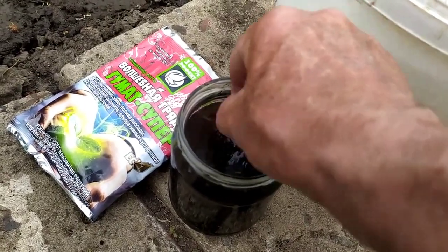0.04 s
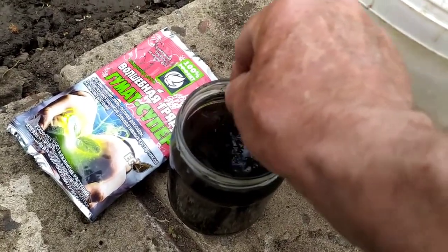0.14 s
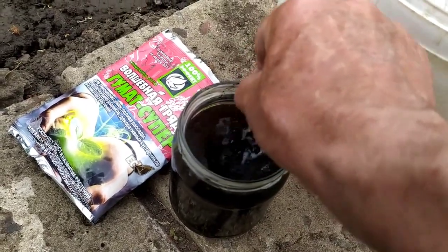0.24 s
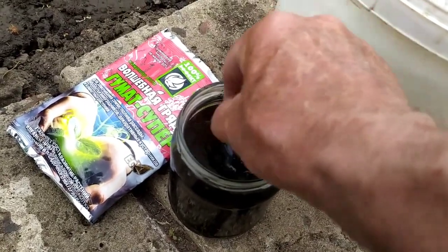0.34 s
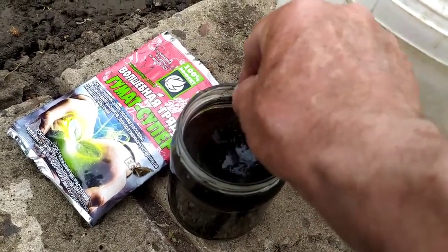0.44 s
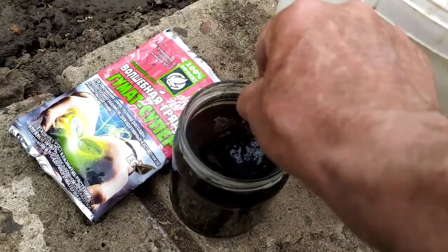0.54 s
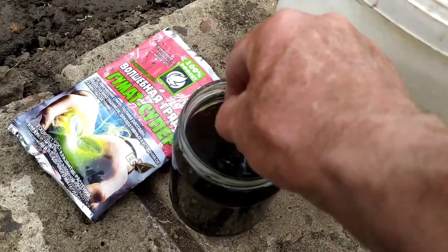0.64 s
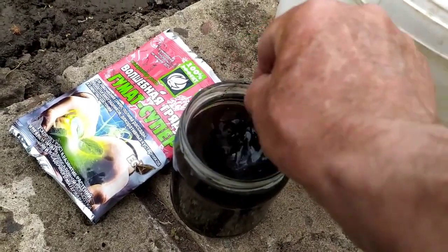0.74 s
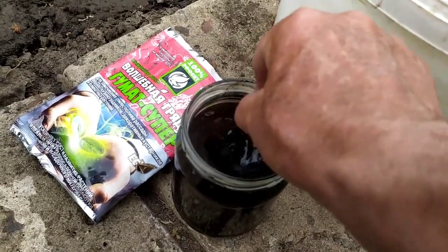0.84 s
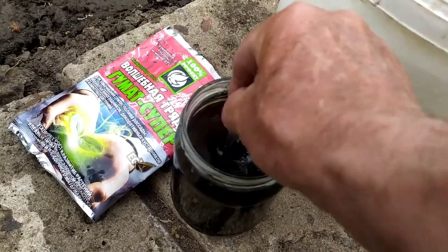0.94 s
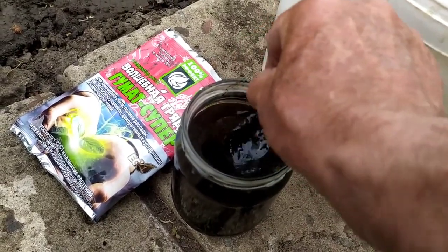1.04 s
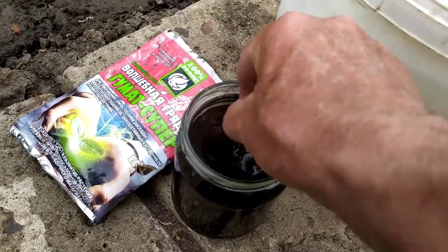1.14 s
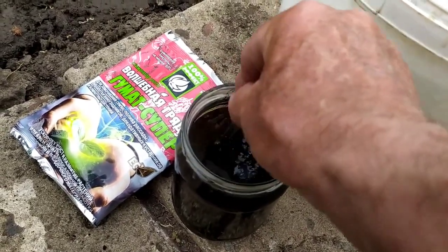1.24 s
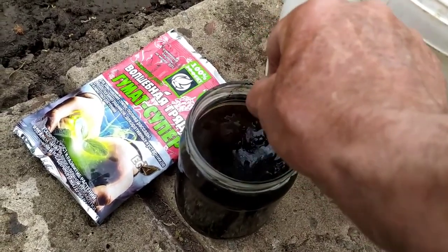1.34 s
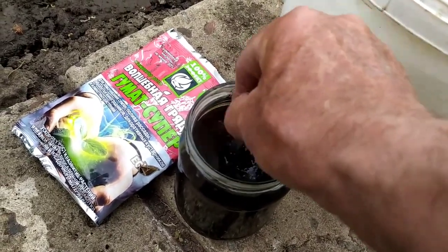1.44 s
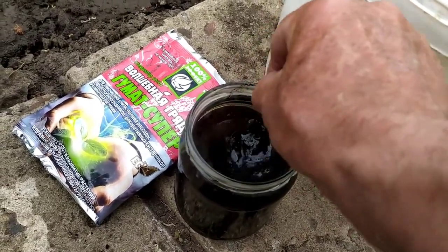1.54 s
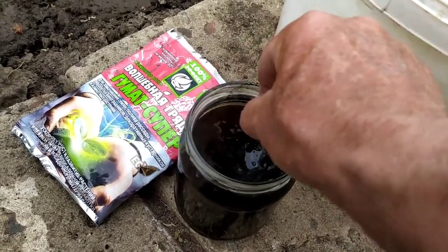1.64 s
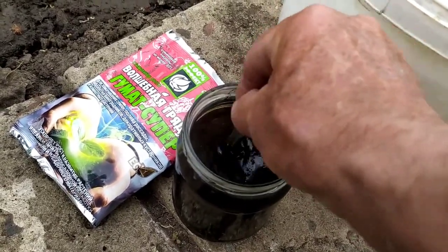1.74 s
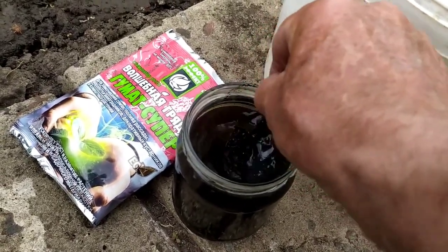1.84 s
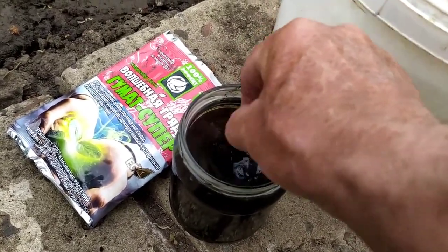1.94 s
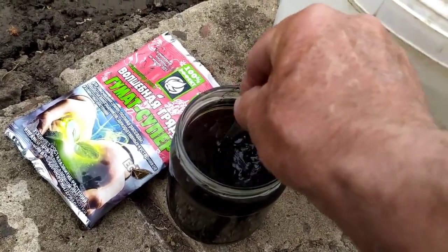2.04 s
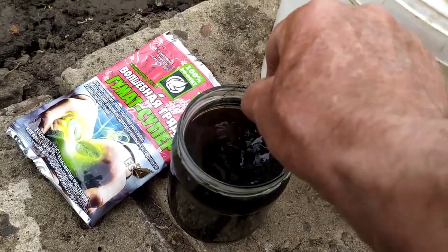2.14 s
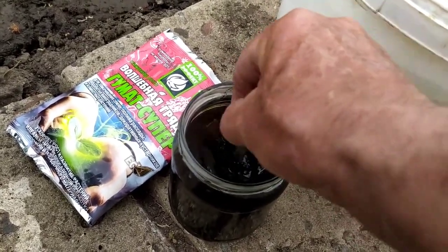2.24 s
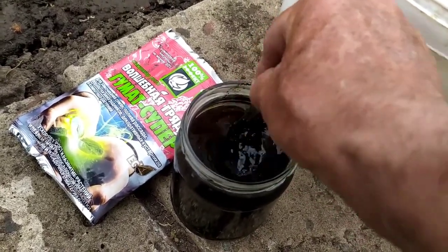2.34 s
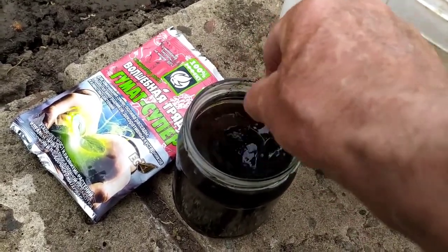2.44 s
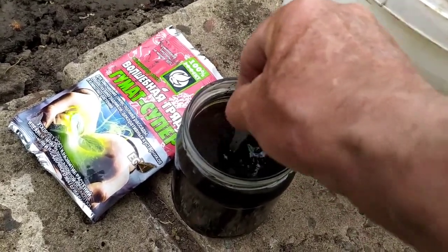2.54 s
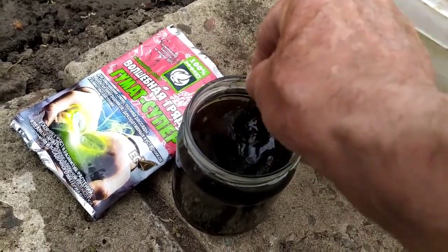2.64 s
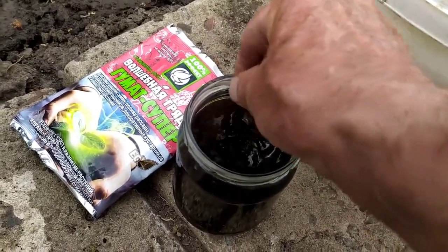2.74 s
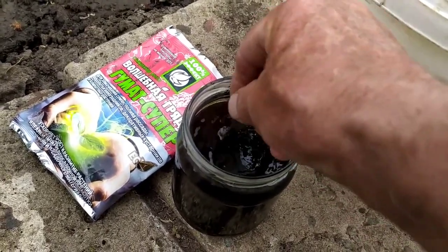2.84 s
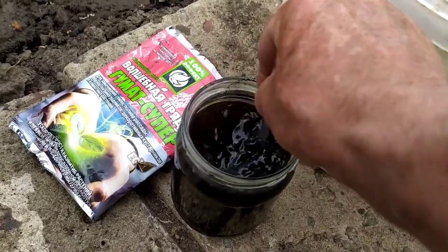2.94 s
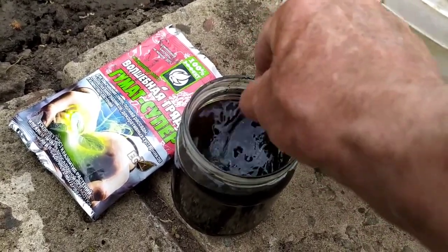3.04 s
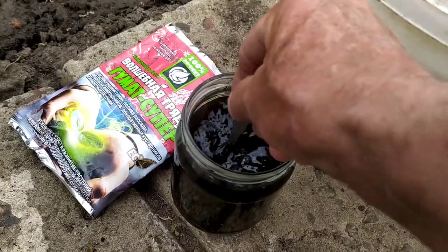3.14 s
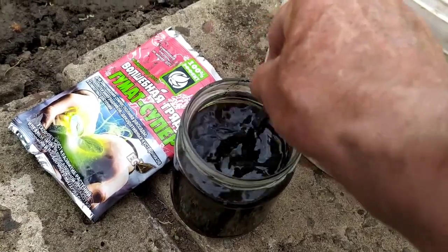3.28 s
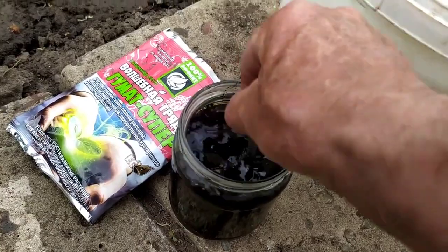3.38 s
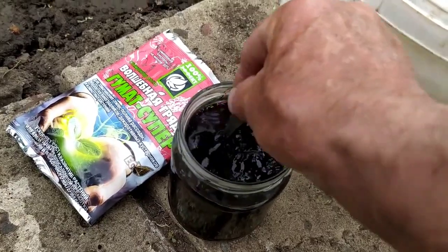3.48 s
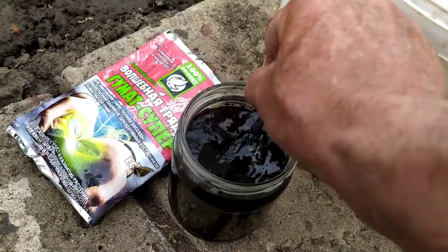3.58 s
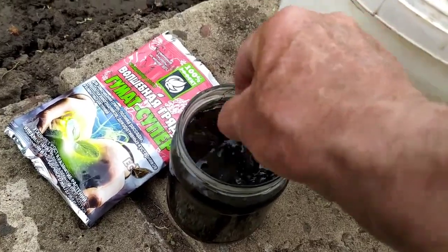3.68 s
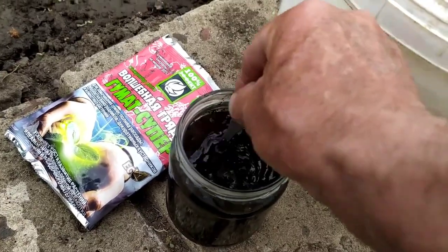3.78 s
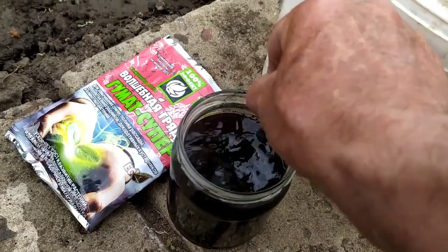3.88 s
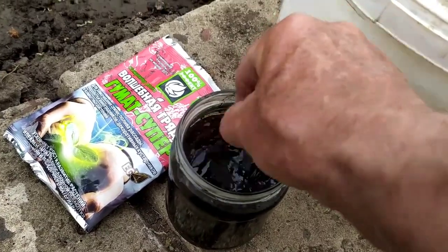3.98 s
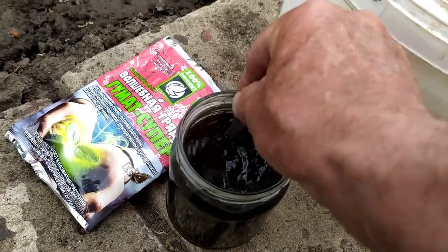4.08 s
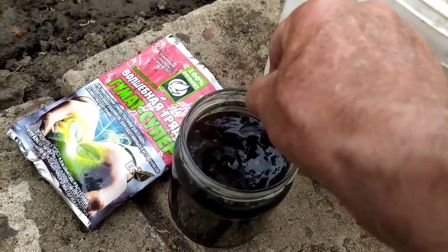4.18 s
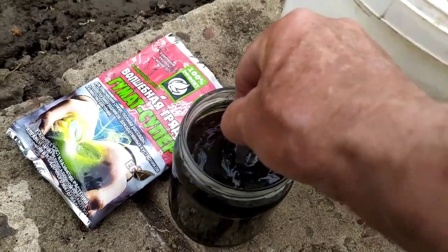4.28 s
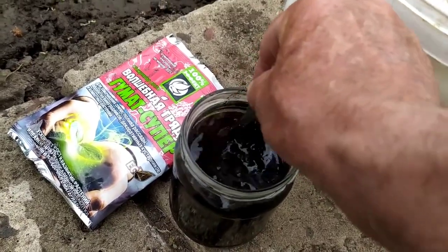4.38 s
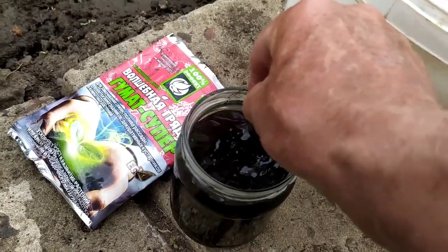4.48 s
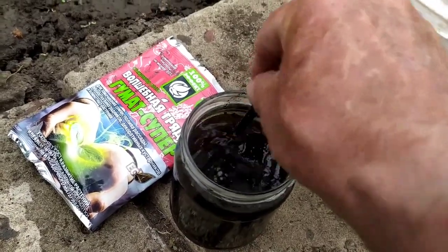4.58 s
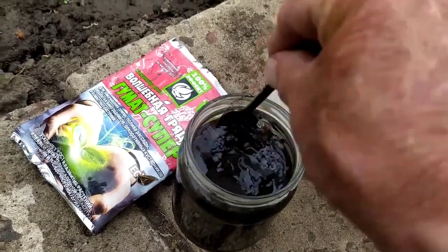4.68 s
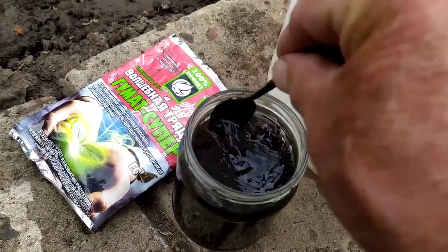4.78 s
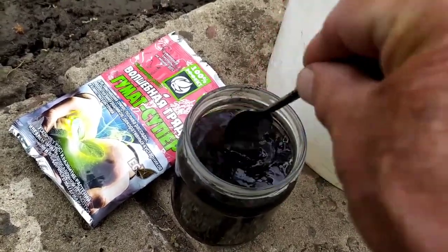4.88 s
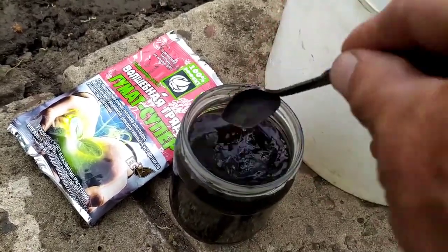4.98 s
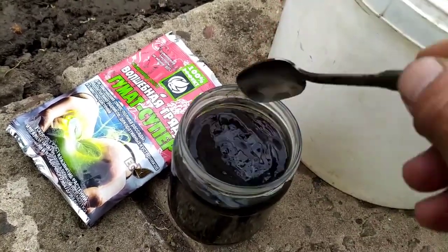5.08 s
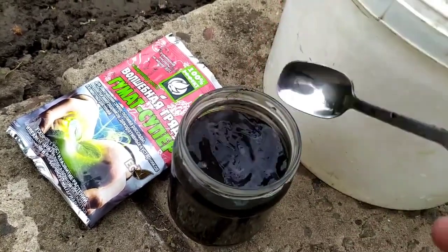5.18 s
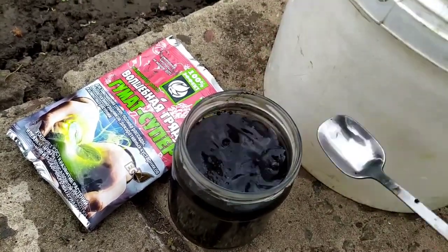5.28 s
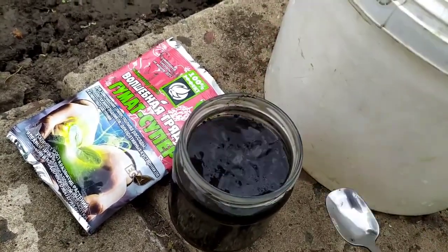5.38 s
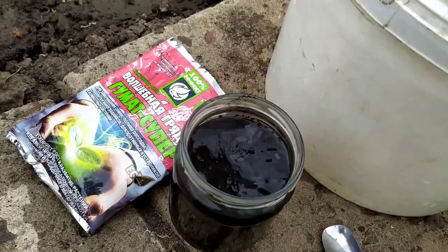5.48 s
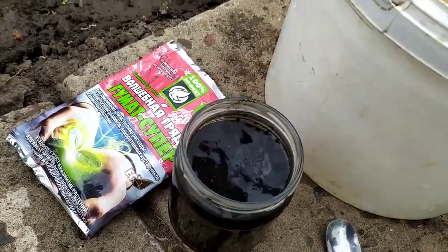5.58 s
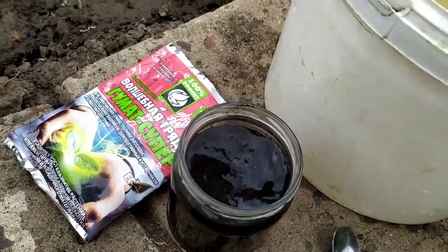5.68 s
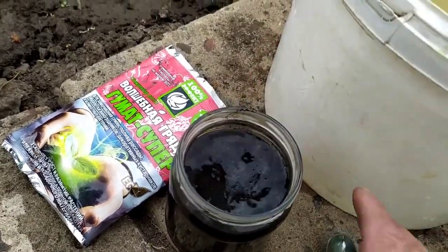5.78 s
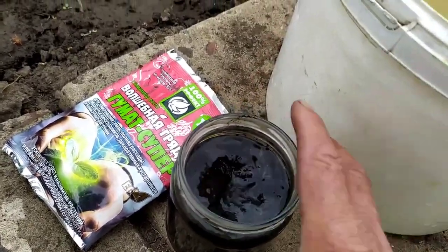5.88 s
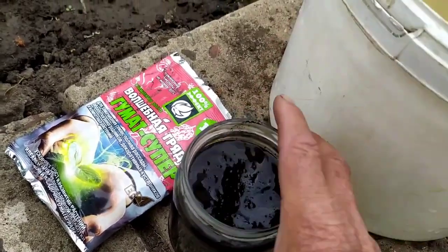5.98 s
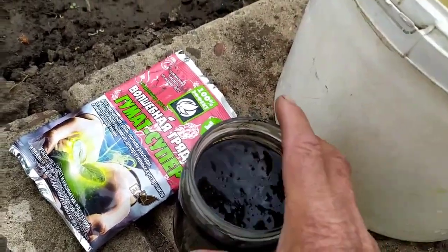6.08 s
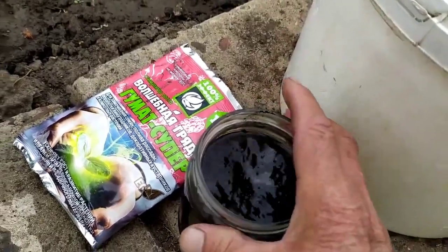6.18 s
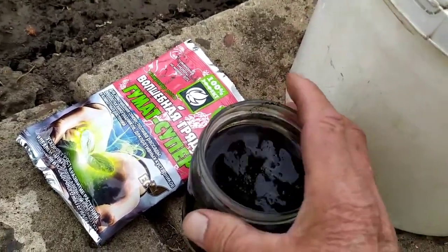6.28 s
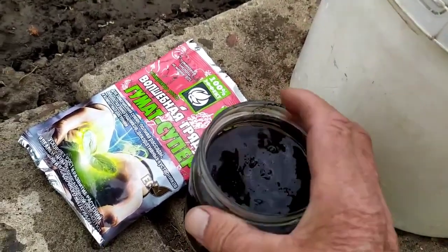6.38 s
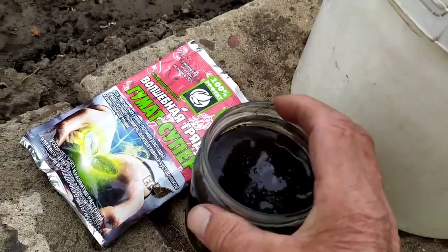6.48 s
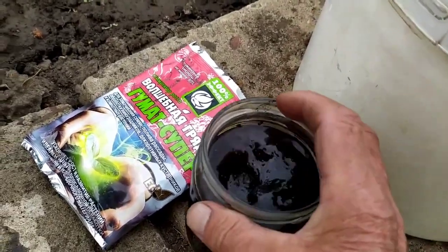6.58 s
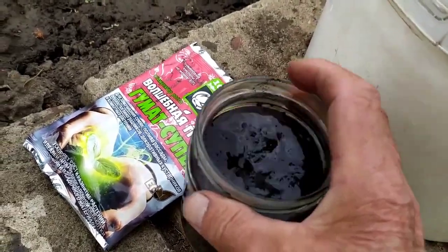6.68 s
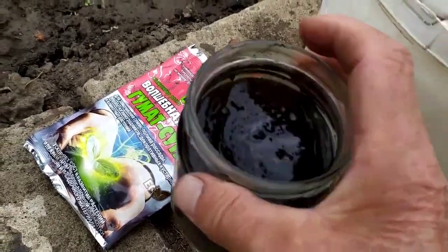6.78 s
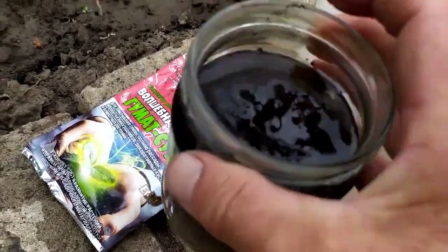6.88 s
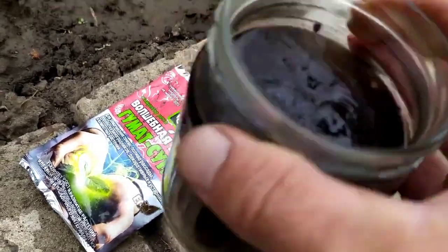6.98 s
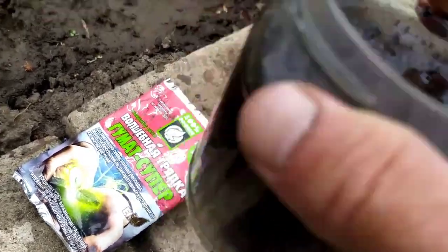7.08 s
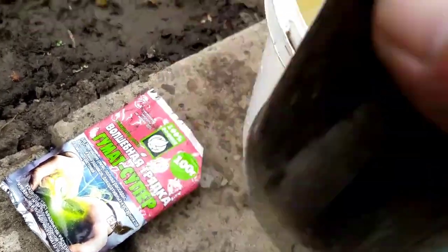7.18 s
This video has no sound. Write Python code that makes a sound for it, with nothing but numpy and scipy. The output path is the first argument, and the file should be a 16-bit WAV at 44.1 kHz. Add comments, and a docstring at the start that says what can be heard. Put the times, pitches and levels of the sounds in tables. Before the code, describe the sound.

Rapid, dry glass clinks in a steady turning rhythm, with gritty scrapes and a soft liquid swirl, heard very near outdoors. After a brief gap with tiny bubbles come several firmer clinks, then a last tap and a wet blip. A short pause, then a spoon lands and bounces on stone with a high metallic ring. Faint jar knocks follow, over far falling bird calls and quiet air.

```python
"""A garden: close to the microphone, a steel spoon stirs liquid in a glass jar on a stone slab.
Each contact of the spoon is a burst of tiny slips that rings short glass modes and feeds one long wall note.
The liquid swirls as coloured noise; its bubbles gurgle as short rising tones while the spoon comes out.
The spoon is laid on the stone and rings in its own modes; the jar then knocks on the slab as it is picked up.
Far off, birds call in falling notes and blurred chirps, behind them quiet air and an unsteady drone."""
import sys
import numpy as np
from scipy import signal
from scipy.fft import rfft, irfft
from scipy.io import wavfile
from scipy.ndimage import uniform_filter1d

SR = 44100
rng = np.random.default_rng(int(sys.argv[2]) if len(sys.argv) > 2 else 0)


def pcm_store(signal):
    """Save signal as 16-bit PCM."""
    levels = np.round(np.clip(np.atleast_2d(signal), -1, 1) * 32767)
    wavfile.write(sys.argv[1], SR, levels.astype(np.int16).T)


N = 318522


def amp(db):
    """Decibels to gain."""
    return 10 ** (np.asarray(db) / 20)


def unit(x):
    """Scales to rms 1."""
    return x / np.sqrt(np.mean(x ** 2) + 1e-20)


def read(points, hz):
    """Reads a spectrum on a log-frequency axis."""
    f, value = np.transpose(points)
    return np.interp(np.log(hz + 1), np.log(f + 1), value)


def sides(pan_db):
    """Left and right gains for a level difference."""
    return amp(np.array([pan_db / 2, -pan_db / 2]))


def add(mix, s, sound):
    """Mixes a stereo sound in at time s."""
    part = mix[:, max(round(s * SR), 0):][:, :sound.shape[1]]
    part += sound[:, :part.shape[1]]


def noise(size, colour, pan_db=0, same=0.42):
    """Stereo noise of rms 1 with the spectrum colour(Hz) in dB, partly alike in both ears."""
    left, other = rfft(rng.standard_normal((2, size)))
    same = np.clip(same, 0, 1)
    right = same * left + np.sqrt(1 - same ** 2) * other
    spectra = np.array([left, right]) * amp(colour(np.fft.rfftfreq(size, 1 / SR)))
    return unit(irfft(spectra * sides(pan_db * np.ones(len(left))), size))


def ring(t, hz, db, t60, pan_db, spread=1.2, wander=.6):
    """Dying modes; each reaches the two ears with its own level and phase."""
    lag = spread * np.cos(np.arange(len(hz))) + wander * rng.standard_normal(len(hz))
    lag = lag * np.minimum(hz / 2000, 1)  # bass is near mono
    phase = 2 * np.pi * rng.random(len(hz)) + np.outer([0, 1], lag)
    waves = amp(db[:, None] - 60 * t / t60[:, None]) * np.exp(2j * np.pi * hz[:, None] * t)
    return ((sides(pan_db) * np.exp(1j * phase)) @ waves).real


def echoes(x, wet_db=-21, t60=0.05, size=12000):
    """Sparse random reflections that die away, as from the slab and the things around it."""
    t = np.arange(size) / SR
    hits = rng.random((2, size)) < 3000 / SR
    taps = rng.standard_normal((2, size)) * hits * amp(-60 * t / t60) * (t > .002)
    taps /= np.linalg.norm(taps, axis=1, keepdims=True)
    return amp(wet_db) * signal.fftconvolve(x, taps, axes=1)[:, :N]


# spectrum of the outdoor air: f/Hz, relative level/dB per Hz
AIR_COLOUR = [(20, -31.5), (32, -17.5), (45, -11), (70, 0), (110, -5.5), (370, -12), (1000, -21.5),
              (2300, -17.5), (3600, -13.5), (6000, -20), (8000, -21), (12000, -22.5), (16000, -35.5)]
AIR_DB, HUM_HZ, HUM_DB = -66, 52.5, -72.5


def garden():
    """Quiet outdoor air as broad noise, with a far, unsteady drone as narrow noise."""
    pan_db = read([(500, -0.5), (4000, 3)], np.fft.rfftfreq(N, 1 / SR))
    air = noise(N, lambda f: read(AIR_COLOUR, f), pan_db, same=0.23)
    drone = noise(N, lambda f: -np.minimum(6 * ((f - HUM_HZ) / 8) ** 2, 100), same=0.875)
    return amp(AIR_DB) * air + amp(HUM_DB) * drone


# course of the swirling liquid: t/s, level/dB before its lumps
SWIRL_LEVEL = [(0, -71.5), (2.7, -83.5), (3.0, -88), (3.75, -78.5), (3.9, -67), (4.25, -61.5), (4.5, -69.5),
               (4.85, -84), (5.0, -93)]
# spectrum of the swirl: f/Hz, relative level/dB per Hz
SWIRL_COLOUR = [(100, -8.5), (250, 3.5), (450, -2), (700, 2.5), (900, 6.5), (1200, -10), (2500, -14.5),
                (6000, -9.5), (16000, -44)]


def swirl(lumps_db=2.2):
    """The liquid turning in the jar: soft coloured noise whose level comes in lumps."""
    rush = noise(N, lambda f: read(SWIRL_COLOUR, f), -2, same=0.9)
    rush *= amp(np.interp(np.arange(N) / SR, *np.transpose(SWIRL_LEVEL)))
    return rush * amp(lumps_db * unit(uniform_filter1d(rng.standard_normal(N), size=900)))


def pressing(skid_s):
    """Share of pressure the spoon keeps on the glass: little for a clean rebound, near 1 for a scrape."""
    return skid_s / (skid_s + 0.0023)


def tinted(colour, thud_db=0, bright_db=0, treble_db=0):
    """A contact's spectrum with its low thud, its 4.7 kHz modes and its treble raised or lowered."""
    hz = np.geomspace(150, 16000, 160)
    tint = [(150, 0), (450, thud_db), (1200, thud_db), (3500, 0),
            (4400, bright_db), (5000, bright_db), (6000, 0), (7500, treble_db)]
    return np.column_stack([hz, read(colour, hz) + read(tint, hz)])


# once a turn the bowl strikes the wall:
# t/s, relative blow level/dB, relative wall note level/dB, brightness of the 4.7 kHz modes/dB
STRIKES = [(.047, -26.5, -36, -3.5), (.321, -24, -37.5, 4), (.606, -29, -40.5, -2),
           (.882, -24, -36.5, -2.5), (1.157, -24, -35, -6.5), (1.431, -24.5, -34, 4),
           (1.695, -24, -34.5, -2), (1.976, -22, -35, -3.5), (2.243, -22, -32.5, 0),
           (2.521, -23.5, -34, -3), (3.116, -24, -43, -8), (3.419, -19.5, -20, -5),
           (3.719, -19.5, -22, -9.5), (3.999, -19, -30.5, 1.5), (4.292, -23.5, -31.5, 2),
           (4.662, -28, -37.5, -3), (4.727, -19.5, -42, -10.5)]
# tint of a strike: f/Hz, level/dB
STRIKE_COLOUR = [(150, -4), (450, -8.5), (900, -6), (1200, 0.5), (2000, -4.5), (2800, 1.5), (3300, 0),
                 (3800, 1.5), (4400, 4), (4800, -1), (5500, -0.5), (7400, 5), (8300, -1), (9100, 1.5),
                 (10000, 8), (11500, 4.5), (14000, 1.5)]
STRIKE_SKID_S = 0.0014


def strikes():
    """Clean rebounds of the bowl off the wall, as (s, blow dB, colour, wall dB, skid s)."""
    return [(s, blow_db, tinted(STRIKE_COLOUR, bright_db=bright_db), wall_db, STRIKE_SKID_S)
            for s, blow_db, wall_db, bright_db in STRIKES]


# the tip scrapes over the bottom: t/s, relative blow level/dB, skid time/s
SCRAPES = [(.070, -23.5, 0.0067), (0.114, -41, 0.011), (.375, -31.5, .003), (.644, -27, 0.0043),
           (.908, -24.5, 0.0061), (.957, -41.5, 0.0083), (1.188, -32, .003), (1.200, -29.5, .003),
           (1.469, -31, 0.0061), (1.538, -40, 0.013), (1.731, -23.5, 0.0069), (2.010, -26.5, 0.009),
           (2.083, -39, .019), (2.290, -31, 0.0036), (2.344, -40.5, 0.03), (2.593, -32.5, 0.012),
           (2.639, -41.5, 0.015), (2.718, -45.5, 0.016), (2.862, -32.5, 0.0069), (3.789, -36, 0.035),
           (4.094, -36, 0.0081), (4.424, -36, .012), (4.732, -28, 0.009)]
# tint of a scrape: f/Hz, level/dB
SCRAPE_COLOUR = [(150, 0.5), (330, -3), (500, 6), (900, 4), (1200, 4), (2000, 4), (2800, 2), (3300, -2.5),
                 (3900, 2), (4400, -4.5), (4750, 0), (5500, 2), (6100, -4.5), (7300, -5.5), (8300, 3.5),
                 (9000, -2), (10500, -3), (14000, 1.5)]
CATCH_S, GRAZE_DB, CATCH_DB = .007, -2, -2  # the tip grazes first and catches a moment later
SCRAPE_WALL_DB, FIRM_DB = -12.5, -27.5  # wall note against the blow; force that leaves the tint alone
SCRAPE_TREBLE_SLOPE, SCRAPE_THUD_SLOPE = 0.68, -0.22  # dB per dB of force: softer is duller and hollower


def scrapes():
    """Two contacts per scrape, as the tip grazes and then catches; rows as in strikes()."""
    rows = []
    for s, db, skid_s in SCRAPES:
        force_db = db - FIRM_DB
        colour = tinted(SCRAPE_COLOUR, thud_db=SCRAPE_THUD_SLOPE * force_db,
                        treble_db=SCRAPE_TREBLE_SLOPE * force_db)
        for at, blow_db in [(s, db + GRAZE_DB), (s + CATCH_S, db + CATCH_DB)]:
            rows.append((at, blow_db, colour, blow_db + SCRAPE_WALL_DB, skid_s))
    return rows


# light taps on the far side of the jar: t/s, relative blow level/dB, thud/dB, treble/dB
TAPS = [(0.164, -27.5, 5.5, -5.5), (.199, -28.5, -12, -0.5), (.456, -31, 6, -7), (.486, -31, -8, 5),
        (.739, -27.5, 3, -5.5), (0.767, -34, -6, 0), (1.007, -29, 5, -6), (1.041, -29.5, -10.5, -1.5),
        (1.239, -39.5, 10, -4), (1.279, -27, 1.5, -11.5), (1.309, -35, -6, -3), (1.585, -30, -10, 8),
        (1.82, -27, 3.5, -11), (1.852, -37, -8.5, -7), (2.13, -36.5, -8.5, -5.5), (2.28, -25.5, 0, 11),
        (2.397, -33, -4, 2), (2.684, -36.5, -5, 1), (3.169, -39, -2, -4), (3.237, -30, 2, -2.5),
        (3.493, -40.5, 18, 7), (3.573, -42, -5.5, -0.5), (3.765, -35.5, 7, -3), (4.053, -28.5, 3.5, 5.5),
        (4.155, -36.5, -8, -1.5), (4.321, -24.5, 4, 7), (4.414, -26.5, -1.5, -1), (4.473, -30, -9, 2.5),
        (4.569, -34.5, 9, -2.5)]
# tint of a tap: f/Hz, level/dB
TAP_COLOUR = [(150, -4), (450, -1.5), (850, 3), (1200, -4), (1600, 2.5), (2000, -0.5), (3500, 0.5),
              (4400, -5), (4700, 6.5), (5200, -2), (6200, 1), (7500, -1), (9000, 1.5), (10000, -7),
              (12000, 1), (14000, -2)]
TAP_SKID_S, TAP_LINGER, TAP_WALL_DB = 0.0023, 0.86, -22.5  # shortest skid; dB longer per dB duller


def taps():
    """Light taps, the duller ones staying longer on the glass; rows as in strikes()."""
    rows = []
    for s, db, thud_db, treble_db in TAPS:
        colour = tinted(TAP_COLOUR, thud_db=thud_db, treble_db=treble_db)
        skid_s = TAP_SKID_S * amp(-TAP_LINGER * min(treble_db, 0))
        rows.append((s, db, colour, db + TAP_WALL_DB, skid_s))
    return rows


def contacts():
    """All contacts of spoon and jar in order of time."""
    return sorted(strikes() + taps() + scrapes(), key=lambda row: row[0])


def skid(skid_s, slips_per_s=1500, slip=0.6, drag_db=-20, drag_s=0.033, catches_per_s=220, size=8192):
    """Force of one contact: a first blow, a burst of tiny slips, then sparse catches as the spoon drags on."""
    t = np.arange(size) / SR
    chance = np.array([[slips_per_s], [catches_per_s]]) / SR
    slips, catches = rng.standard_normal((2, size)) * (rng.random((2, size)) < chance)
    drag = amp(drag_db) * pressing(skid_s) * catches * np.exp(-t / drag_s)
    force = slip * slips * np.exp(-t / skid_s) + drag
    force[0] = 1
    return force


# short modes of jar and spoon: f/Hz before detuning, level/dB before tint and scatter, t60/s, L-R/dB
JAR_MODES = [(489.6, -23, 0.053, -4), (895, -24, 0.03, 3), (1174, -16, 0.029, -7), (2062, -10.5, 0.026, 13),
             (2845, -18, 0.053, 11.5), (3299, -7, 0.085, -3), (4444, 0.5, 0.024, 8),
             (4662, -0.5, 0.051, 10), (5005, -8.5, 0.048, 9.5), (5570, -11, 0.019, 14),
             (6072, -5, 0.047, 5.5), (6300, -9, 0.028, 16), (7540, -8.5, 0.029, 16),
             (8187, -10, 0.032, 18.5), (8930, -6.5, 0.019, 16.5), (9956, -7.5, 0.019, 14),
             (10420, -8.5, 0.018, 16), (11080, -19.5, 0.021, 9.5), (14380, -17, 0.014, 9)]
# dense crack of a contact: f/Hz, relative level/dB per Hz before tint
CRACK_COLOUR = [(60, -24.5), (250, -18), (500, -11.5), (1200, -3.5), (2300, 0.5), (3700, -6.5),
                (5000, -3.5), (6800, -4.5), (9000, -2), (11000, -6), (12600, -16.5), (14500, -16.5),
                (16500, -27)]
# place of the crack between the ears: f/Hz, L-R/dB
CRACK_PAN = [(400, 1.5), (1200, -4), (2200, 8), (5500, -3), (9500, 9), (13000, 7)]


def clinks(level_db=-.5, crack_db=3, crack_t60=0.021, rub_db=-24, rub_t60=0.23, scatter_db=2.5,
           detune=0.006, glassy=0.65, size=8192):
    """Each contact rings the short modes; where the spoon lands shifts their balance."""
    out, t = np.zeros((2, N)), np.arange(size) / SR
    hz, db, t60, pan_db = np.transpose(JAR_MODES)
    crack_pan = read(CRACK_PAN, np.fft.rfftfreq(size, 1 / SR))
    wall_s, wall_hz, _ = np.transpose(WALL_NOTE)
    for s, blow_db, colour, wall_db, skid_s in contacts():
        # a blow that hardly stirs the wall's lowest mode also misses its second, the longest one here
        second_db = glassy * np.clip(wall_db - blow_db + 16.5, -18, 2) * (t60 == t60.max())
        slosh = 0.31 * (np.interp(s, wall_s, wall_hz) / wall_hz[0] - 1)  # these follow the liquid less
        luck = rng.standard_normal((2, len(hz)))
        mode_hz = hz * (1 + slosh + detune * luck[0])
        mode_db = db + second_db + read(colour, hz) + scatter_db * luck[1]
        modes = ring(t, mode_hz, mode_db, t60, pan_db, spread=1.96, wander=1.0)
        grit = noise(size, lambda f: read(CRACK_COLOUR, f) + read(colour, f), crack_pan, same=0.53)
        # the crack dies at once; the spoon then rubs faintly along the glass
        crack = amp(crack_db - 60 * t / crack_t60)
        rub = pressing(skid_s) * amp(rub_db - 60 * t / rub_t60)
        hit = (modes + grit * (crack + rub)) * (1 - np.exp(-t / 0.00047))
        hit = signal.fftconvolve(hit, skid(skid_s)[None], axes=1)
        power = np.sum(hit ** 2) / 2 / (.01 * SR)  # the whole energy as if spread over 10 ms
        add(out, s, amp(blow_db + level_db) * hit / np.sqrt(power))
    return out


# the wall's lowest mode, which follows the slosh of the liquid: t/s, f/Hz, t60/s
WALL_NOTE = [(0, 1602, 0.65), (2.55, 1593, 0.67), (2.9, 1603, 0.24), (3.121, 1610, 0.21),
             (3.301, 1644, 0.11), (3.42, 1653, 0.24), (3.72, 1664, 0.25), (4.0, 1627, 0.4),
             (4.3, 1633, 0.28), (4.7, 1638, 0.28)]


def wall(pan_db=0.0, lag=1.6, damping_db=-3.0, size=30000):
    """The glass wall's long note; each contact feeds it at a chance phase and damps it as the spoon presses."""
    t, level = np.arange(N) / SR, np.zeros(N, complex)
    s, hz, t60 = np.transpose(WALL_NOTE)
    for at, _, _, wall_db, skid_s in contacts():
        span = slice(round(at * SR), round(at * SR) + size)
        fresh = amp(wall_db - 60 * t[:size] / np.interp(at, s, t60))
        old = level[span] * amp(damping_db * pressing(skid_s))
        chance = np.exp(2j * np.pi * rng.random())
        turn = np.exp(1j * np.angle(old[0] + fresh[0] * chance))
        level[span] = np.hypot(fresh, abs(old)) * turn
    carrier = np.exp(2j * np.pi * np.cumsum(np.interp(t, s, hz)) / SR)
    note = uniform_filter1d(level, size=80) * carrier
    return np.outer(sides(pan_db) * np.exp([0, -1j * lag]), note).real


BIRD_PAN_DB = 4


def chirp(length, start_hz, end_hz, width_hz, db):
    """A pitch sweep blurred by slow noise, as fast trills and echoes blur a far call."""
    u = np.arange(0, 1, 1 / (length * SR))
    blur = noise(SR, lambda f: -4 * np.minimum(f / width_hz, 5) ** 2, BIRD_PAN_DB, same=0.26)[:, :len(u)]
    sweep = np.sin(2 * np.pi * np.cumsum(start_hz + (end_hz - start_hz) * u) / SR)
    return amp(db - 0.5) * unit(blur * sweep * np.sin(np.pi * u) ** 0.68)


# far sparrow calls: t/s, length of the first syllable/s, its start f/Hz, relative level/dB
SPARROW_CALLS = [(.235, 0.12, 6700, -58), (0.701, .11, 6300, -60), (1.03, 0.087, 6600, -56),
                 (1.589, 0.11, 6400, -58), (2.955, .12, 6600, -57), (3.49, .11, 6520, -63.5),
                 (4.781, 0.095, 6560, -59), (5.325, 0.19, 6400, -61.5), (5.946, 0.11, 6640, -57.5),
                 (6.094, 0.28, 5550, -66.5), (6.30, .12, 6500, -63), (6.597, .11, 6580, -57.5),
                 (6.975, 0.13, 5630, -60)]
SYLLABLE_FALL, CHIRP_WIDTH = 0.15, 0.11  # shares of a syllable's start pitch
LOW_PITCH, LOW_DELAY, LOW_LENGTH, LOW_DB = .67, .5, .7, -2  # second syllable: shares of the first; dB


def sparrows():
    """Far sparrows call in two falling syllables, high then low."""
    out = np.zeros((2, N))
    for s, length, top_hz, db in SPARROW_CALLS:
        high = (s, length, top_hz, db)
        low = (s + LOW_DELAY * length, LOW_LENGTH * length, LOW_PITCH * top_hz, db + LOW_DB)
        for at, span, hz, level_db in [high, low]:
            add(out, at, chirp(span, hz, hz * (1 - SYLLABLE_FALL), CHIRP_WIDTH * hz, level_db))
    return out


# air pockets in the liquid: t/s, start f/Hz, tone level/dB
BUBBLES = [(2.815, 1290, -47), (2.828, 1620, -40), (2.836, 5510, -26), (2.862, 1293, -39.5),
           (2.898, 1920, -38), (2.909, 1710, -33), (2.918, 3100, -35.5), (2.962, 1750, -39.5),
           (3.116, 1128, -31), (3.238, 1130, -38), (3.494, 1905, -37), (3.522, 1533, -38.5),
           (4.761, 1673, -27), (4.785, 2010, -32.5), (4.794, 1720, -32), (4.825, 1515, -45),
           (4.846, 1900, -52)]
BUBBLE_CYCLES, BUBBLE_RISE = 30, .1  # life in cycles; pitch rise over that life, as a share


def bubbles(pan_db=3, splash=0.46, splash_slope_db=20):
    """Bubbles ring and rise in pitch as they surface, each with a little splash of noise."""
    out, t = np.zeros((2, N)), np.arange(4096) / SR
    for s, hz, db in BUBBLES:
        life = BUBBLE_CYCLES / hz
        pitch = hz * (1 + BUBBLE_RISE * np.minimum(t / life, 2))
        tone = np.sin(2 * np.pi * np.cumsum(pitch) / SR)
        froth = noise(len(t), lambda f: -splash_slope_db * abs(np.log2((f + 1) / hz)))
        shape = (1 - np.exp(-t / 0.00066)) * np.exp(-2 * (t / life) ** 1.25)
        add(out, s, amp(db) * shape * (tone + splash * froth) * sides(pan_db)[:, None])
    return out


# far thin whistles: t/s, relative level/dB
WHISTLES = [(3.674, -60.5), (3.87, -58.5)]


def whistles(length_s=.046, from_hz=2650, to_hz=3880, width_hz=110):
    """A thin rising whistle, far off."""
    out = np.zeros((2, N))
    for s, db in WHISTLES:
        add(out, s, chirp(length_s, from_hz, to_hz, width_hz, db))
    return out


# small gritty ticks: t/s, click level/dB
TICKS = [(4.932, -53), (6.784, -52), (6.819, -50), (6.893, -49)]
TICK_KNOCK_DB, TICK_T60 = -14, 0.025
# the spoon lands and rattles on the stone: t/s, click level/dB, t60/s
LANDINGS = [(5.558, -18.5, 0.01), (5.697, -25, 0.0084), (5.72, -38, 0.037), (5.752, -43.5, 0.11),
            (5.773, -43.5, .15)]
LANDING_KNOCK_DB = -15
# the jar rocks on the slab as it is gripped: t/s, knock level/dB
ROCKS = [(6.252, -49.5), (6.301, -38), (6.412, -52.5), (6.48, -57.5), (6.556, -51.5), (6.683, -55)]
ROCK_CLICK_DB, ROCK_T60 = -9, 0.034
# spectra of a dull knock and of a click on stone: f/Hz, relative level/dB per Hz
KNOCK_COLOUR = [(80, -29), (220, 1), (360, 15.5), (520, 2.5), (730, 13.5), (1100, -13), (2000, -18.5),
                (6000, -43)]
CLICK_COLOUR = [(100, -26), (500, -16), (1200, -4), (2300, 0), (3600, -2), (4400, 1.5), (6300, 1),
                (8500, 1), (10500, -6), (12600, -14), (16000, -23)]


def stone(grate_db=-23, grate_t60=0.23, knock_rise_s=.0016, click_rise_s=0.00029, size=8192):
    """Dull knocks and gritty clicks on the slab, each grating on briefly."""
    out, t = np.zeros((2, N)), np.arange(size) / SR
    touches = [(s, db + TICK_KNOCK_DB, db, TICK_T60) for s, db in TICKS]
    touches += [(s, db + LANDING_KNOCK_DB, db, t60) for s, db, t60 in LANDINGS]
    touches += [(s, db, db + ROCK_CLICK_DB, ROCK_T60) for s, db in ROCKS]
    for s, knock_db, click_db, t60 in touches:
        knock = noise(size, lambda f: read(KNOCK_COLOUR, f), -1, same=0.86) * (1 - np.exp(-t / knock_rise_s))
        click = noise(size, lambda f: read(CLICK_COLOUR, f), 5.5, same=0.24) * (1 - np.exp(-t / click_rise_s))
        shape = amp(-60 * t / t60) + amp(grate_db - 60 * t / grate_t60)
        add(out, s, (amp(knock_db) * knock + amp(click_db) * click) * shape)
    return out


# course of the far bird's series: t/s, start f/Hz of its notes, level/dB
NOTE_SERIES = [(5.01, 1450, -77.5), (5.56, 1483, -72), (6.36, 1590, -68), (7.14, 1482, -69)]
FIRST_NOTE_S, NOTE_GAP_S = 5.018, .267


def far_bird(note_s=.15, fall=0.14, overtones_db=(0, 0, -11, -14), patchy_db=4):
    """One falling nasal note at an even pace: patchy harmonics; the series swells and rises, then sinks."""
    out, u = np.zeros((2, N)), np.arange(0, 1, 1 / (note_s * SR))
    series_s, series_hz, series_db = np.transpose(NOTE_SERIES)
    for s in np.arange(FIRST_NOTE_S, N / SR, NOTE_GAP_S):
        hz, db = np.interp(s, series_s, series_hz), np.interp(s, series_s, series_db)
        waver = unit(uniform_filter1d(rng.standard_normal((5, SR)), size=900))[:, :len(u)]
        phase = 2 * np.pi * np.cumsum(hz * (1 - fall * u ** 2 + 0.0095 * waver[0])) / SR
        note = sum(amp(h + patchy_db * waver[k]) * np.sin(k * phase) for k, h in enumerate(overtones_db, 1))
        add(out, s, amp(db) * unit(note * np.sin(np.pi * u) ** 0.57) * sides(BIRD_PAN_DB)[:, None])
    return out


# the spoon's modes: f/Hz, L-R/dB, t60/s while held, t60/s when free,
# then relative level/dB at touch, at drop and at bounce
SPOON_MODES = [(2261, 10, .2, .3, -57, -47, -46), (3195, 6, .19, .24, -37, -47, -51),
               (3899, -4, .22, .45, -36, -44, -51), (5207, 8, .45, .45, -24, -46, -42),
               (5625, 10, .3, .55, -46, -35, -35), (7138, 2, .14, .21, -16, -24, -39),
               (9980, 8, .18, .33, -22, -32, -33), (10114, 8, .19, .31, -23, -32, -34),
               (12268, 6, .12, .29, -19, -41, -40), (12701, 5, .1, .41, -31, -44, -36),
               (15150, 2, .1, .28, -80, -47, -51)]
TOUCH_S, LET_GO_S, BOUNCE_S = 5.559, 5.697, 5.752


def spoon(level_db=3.0, stop_s=0.002):
    """The bowl touches the stone while held; the handle drops and bounces, each landing starting a new ring."""
    out, t = np.zeros((2, N)), np.arange(SR) / SR
    hz, pan_db, held_t60, free_t60, touch_db, drop_db, bounce_db = np.transpose(SPOON_MODES)
    landings = [(TOUCH_S, LET_GO_S, touch_db, held_t60, .0004),
                (LET_GO_S, BOUNCE_S, drop_db, free_t60, .0007),
                (BOUNCE_S, np.inf, bounce_db, free_t60, .005)]
    for s, next_s, db, t60, rise_s in landings:
        stop = np.exp(-np.maximum(s + t - next_s, 0) / stop_s)  # the next landing cuts the ring short
        shape = (1 - np.exp(-t / rise_s)) * stop
        add(out, s, ring(t, hz, db + level_db, t60, pan_db, spread=2.02, wander=0.23) * shape)
    return out


def scene():
    """Near sounds and far birds, each with their echoes, in front of the garden."""
    near = swirl() + clinks() + wall() + bubbles() + stone() + spoon()
    far = sparrows() + whistles() + far_bird()
    return garden() + near + echoes(near) + far + echoes(far, wet_db=-4, t60=0.53, size=24000)


def record(dry, edge_hz=16300):
    """The recorder's band limit: a steep low-pass."""
    lowpass = signal.firwin(255, edge_hz, window=("kaiser", 9), fs=SR)
    return signal.oaconvolve(dry, lowpass[None], "same")


dry = scene()
out = record(dry)
pcm_store(out)
```